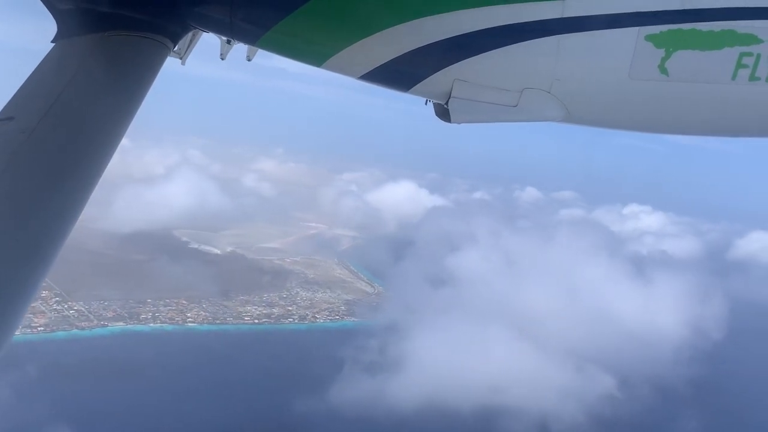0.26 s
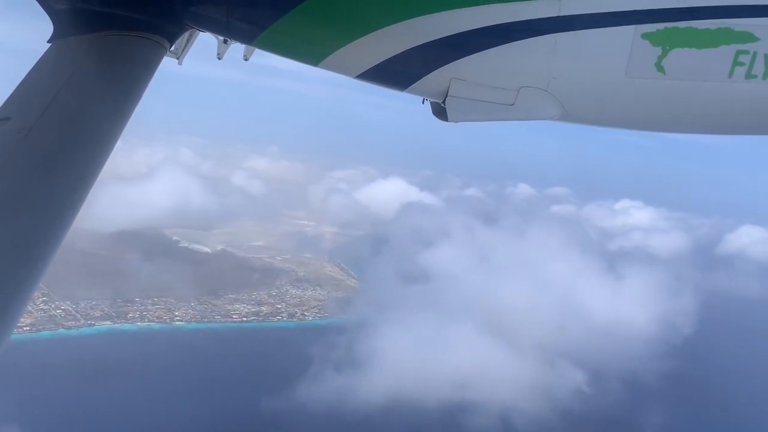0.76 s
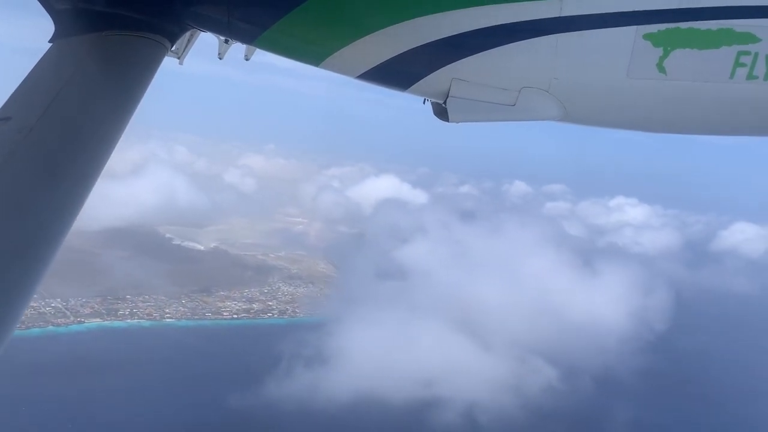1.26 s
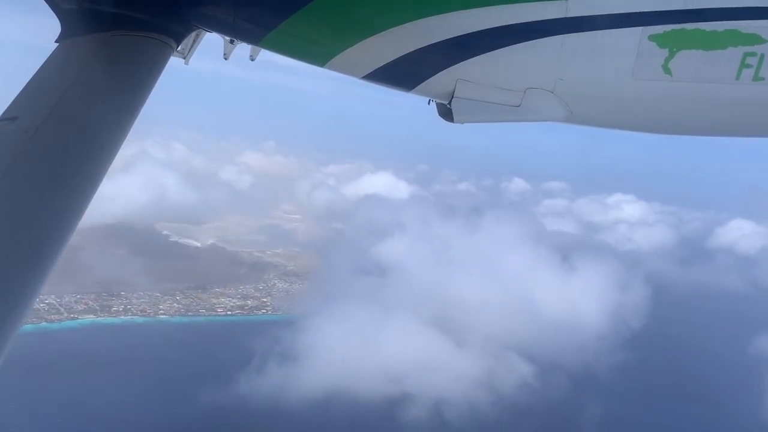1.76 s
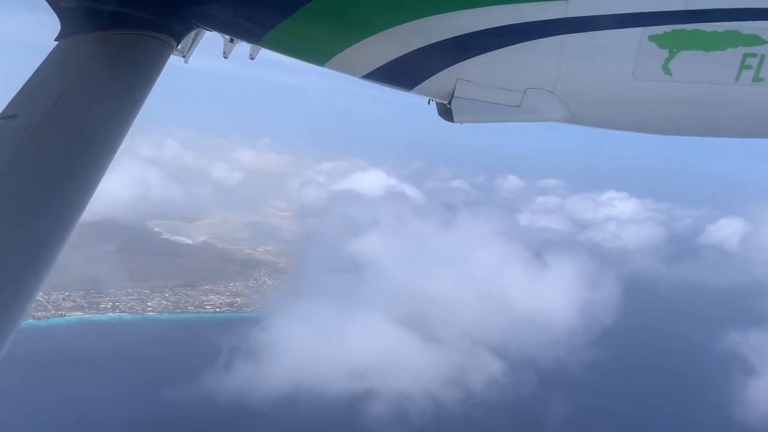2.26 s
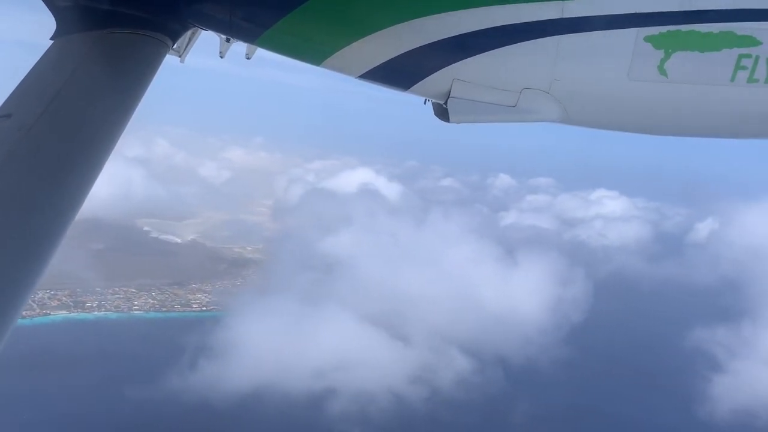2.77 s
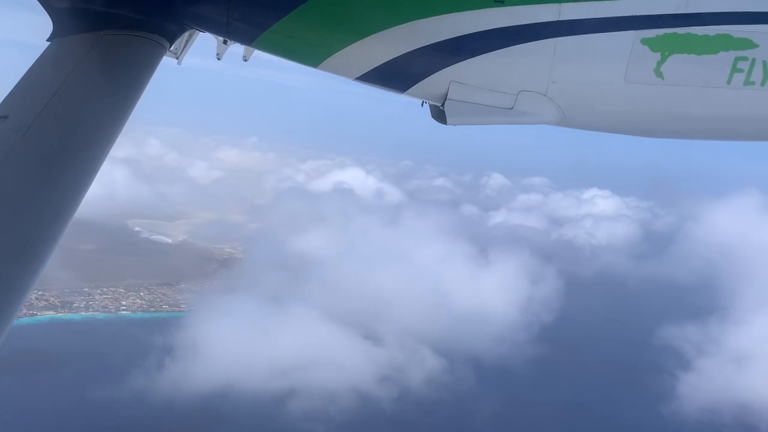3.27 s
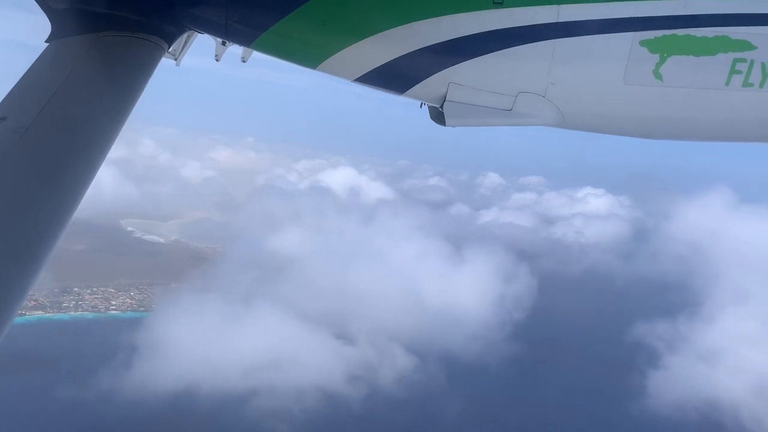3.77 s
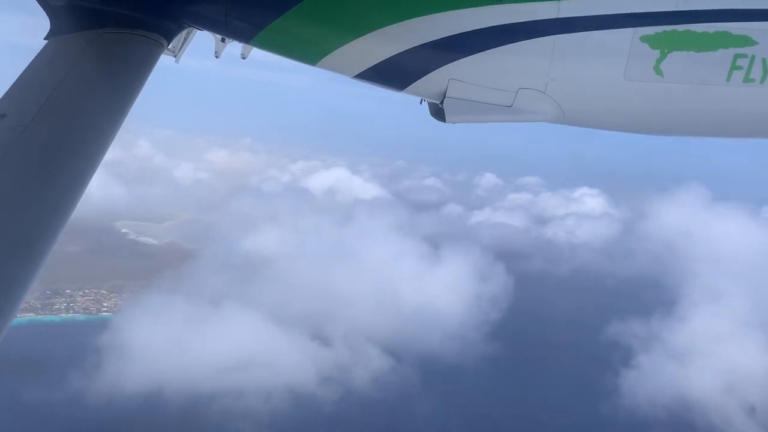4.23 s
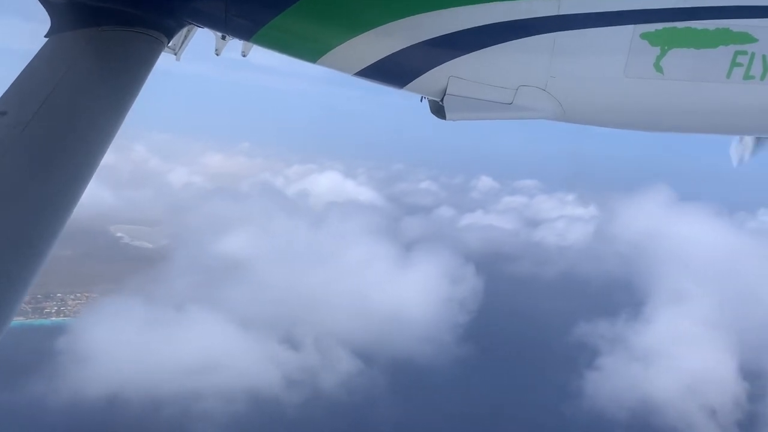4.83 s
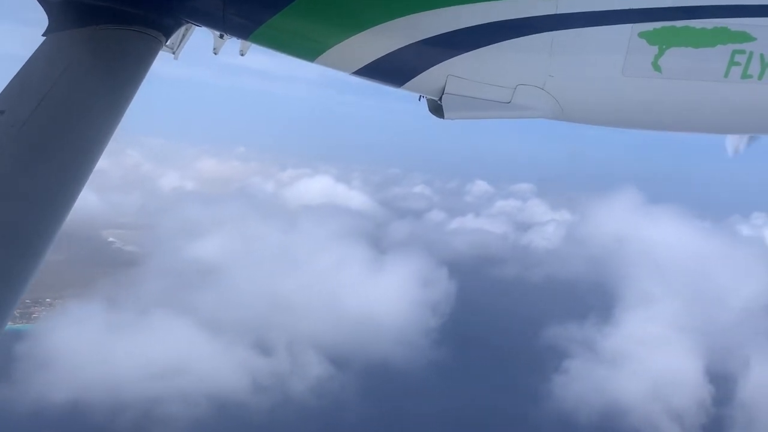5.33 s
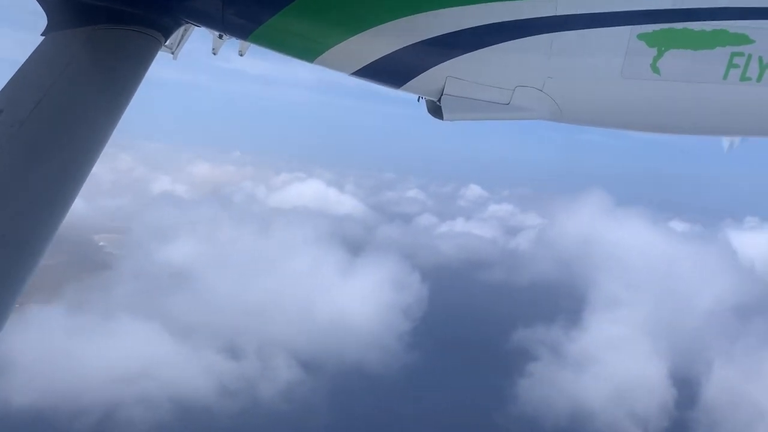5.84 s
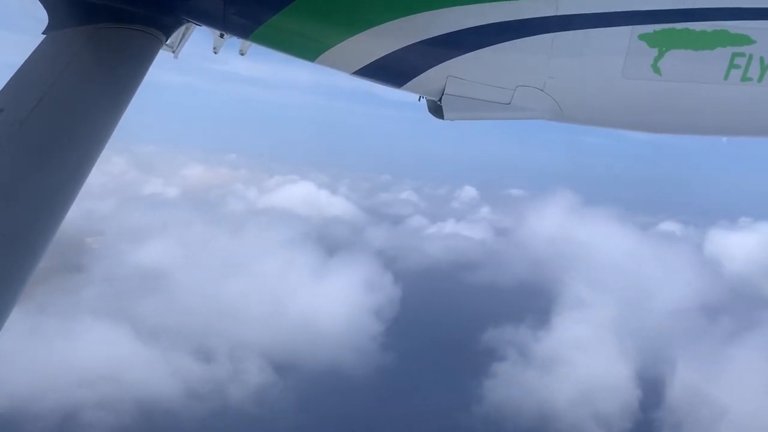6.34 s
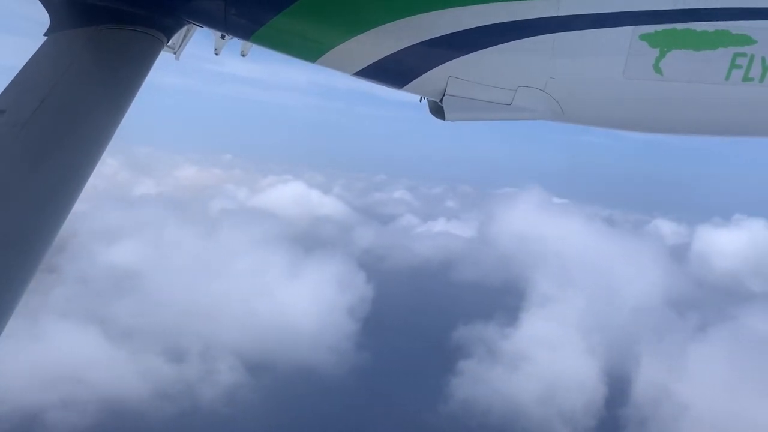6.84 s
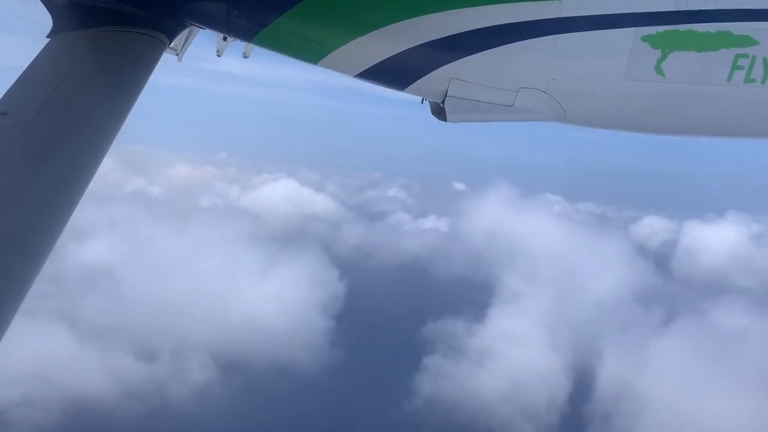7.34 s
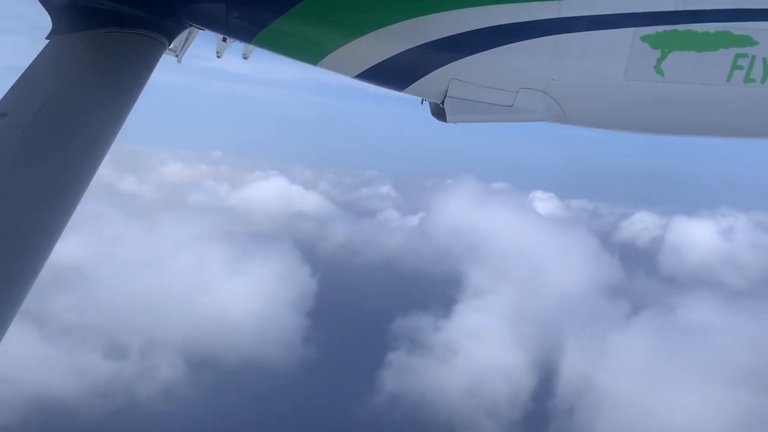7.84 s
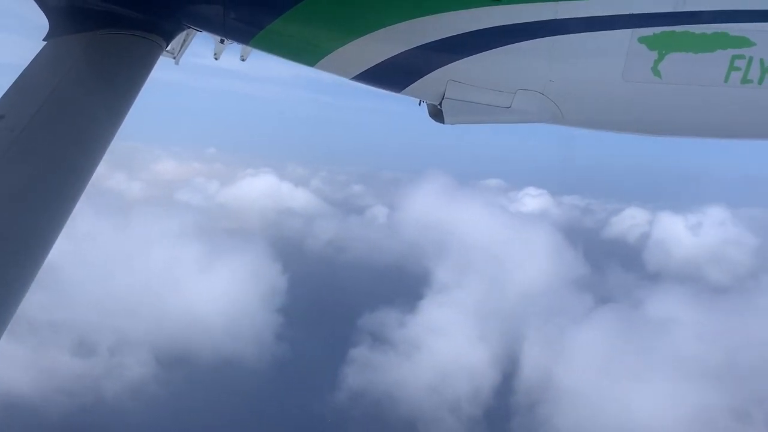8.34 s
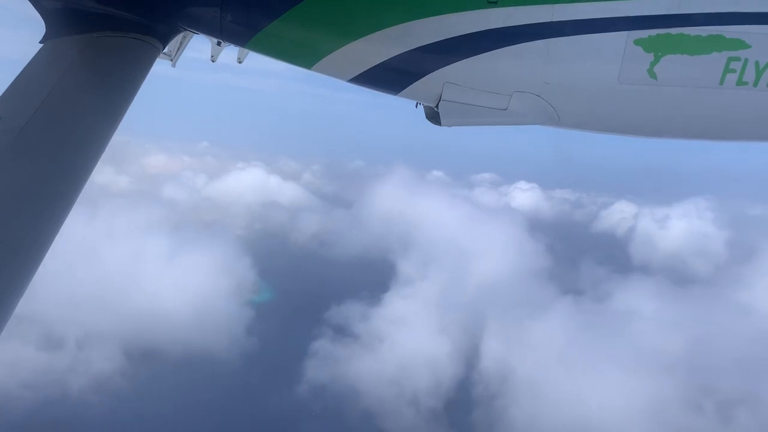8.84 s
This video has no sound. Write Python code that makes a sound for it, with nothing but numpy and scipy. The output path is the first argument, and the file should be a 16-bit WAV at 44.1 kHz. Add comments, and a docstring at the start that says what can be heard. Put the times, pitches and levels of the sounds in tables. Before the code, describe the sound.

A loud, low propeller drone fills a small plane's cabin, gently rising and falling, with rushing air and a faint whine.

```python
"""Inside the cabin of a twin turboprop in the climb, two close microphones beside a window.
Two three-blade propellers turn at almost the same speed, so their blade tones beat slowly. The trim
buzzes and the gearbox whines; these and the blade tones swell and fade as the microphones shift nearer
the wall and away. Airflow booms, rumbles and hisses through the wall, over a shaft hum and a faint whistle.
"""
import sys
import numpy as np
from scipy import signal
from scipy.fft import rfft, irfft, next_fast_len
from scipy.io import wavfile

SR = 44100
rng = np.random.default_rng(int(sys.argv[2]) if len(sys.argv) > 2 else 0)


def wav_out(sig):
    """Save sig, one row per channel (or a flat mono array), as 16-bit PCM at SR to the path in sys.argv[1]."""
    wavfile.write(sys.argv[1], SR, np.round(np.clip(np.atleast_2d(sig).T, -1, 1) * 32767).astype(np.int16))


N = 401310
TIME = np.arange(N) / SR
BLADES = 3

# Stereo image by frequency, with a hollow, out-of-phase band of hiss near 10-11 kHz:
# (frequency [Hz], likeness [0-1], left lead [rad], left over right [dB])
STEREO_IMAGE = [(30, .985, 0, -1), (70, .99, 0, -1.5), (220, .95, 0, -1.5), (400, .6, .2, 0),
                (520, .15, 0, 3), (800, .45, -1.1, 1), (1000, .2, -1.5, 2), (1200, .83, 0, 2),
                (1500, .45, -2.6, -1), (1680, .4, -2.4, 0), (1780, .3, -1, 0), (1940, .75, -2.2, 0),
                (2100, .4, -2.2, 1), (2300, .5, -.3, 2), (2440, .5, -2, 3), (2650, .3, 0, 2),
                (2930, .6, -2.3, 1), (3030, .4, -.5, 1), (3090, .5, -2.4, 1), (3300, .2, -2.5, 0),
                (4000, .2, 0, 1), (6000, .2, 0, -1.5), (6800, .5, 0, -1), (7000, .93, 0, -.5),
                (8100, .93, 0, 0), (8400, .6, -.5, 0), (9400, .89, -2.2, 0), (9600, .9, -2.6, 0),
                (9700, 1, -np.pi, 0), (11000, 1, -np.pi, 0), (11100, .9, -3.2, 0), (11600, .8, -3.4, 0),
                (11900, .72, -4.4, 0), (12350, .5, -5, 0), (12500, 1, -2 * np.pi, 0),
                (14400, 1, -2 * np.pi, 0), (14550, .8, -6.28, 0), (15050, .3, -6.28, 0),
                (15250, .75, -9.4, 0)]
# Hum and air at the seat: (time [s], hum at twice the shaft rate [dB], airflow hiss on the wall [dB])
CABIN_LEVELS = [(0, -47, -39), (1, -43, -38.5), (3.4, -44.5, -40), (4.6, -41, -39.5), (6, -38, -39.5),
                (6.8, -31, -37), (7.5, -36, -37), (8.2, -38, -37.5), (9.1, -36, -39.5)]


def propeller(blade_hz, start_rad, tones, gains_db):
    """Blade tones, each by its own path to either microphone, and the phase of the blade passes."""
    blade_phase = start_rad + 2 * np.pi * np.cumsum(blade_hz) / SR
    out = np.zeros((2, N))
    for k, left_db, right_db, left_rad, right_rad in tones:
        tone = np.cos(round(k) * blade_phase + [[left_rad], [right_rad]])
        out += tone * from_db([[left_db], [right_db]]) * from_db(gains_db.get(round(k), 0))
    return np.sqrt(2) * out, blade_phase


def twin_propellers(gains_db):
    """Two propellers beating through the cabin; also gives the right one's blade phase and rate."""
    # The governors hunt a little: (time [s], left blade rate [Hz], right blade rate [Hz])
    blade_rates = [(0.0, 85.922, 85.81), (0.7, 85.929, 85.793), (1.4, 85.881, 85.792),
                   (2.1, 86.093, 85.883), (2.8, 86.026, 85.976), (3.5, 86.155, 85.833),
                   (4.2, 86.012, 85.955), (4.9, 85.973, 85.938), (5.6, 85.984, 86.011),
                   (6.3, 86.203, 85.989), (7.0, 86.256, 85.926), (7.7, 86.267, 86.001),
                   (8.4, 86.07, 86.069), (9.1, 86.16, 86.013)]
    # Each propeller's tones at the microphones:
    # (harmonic, left base level [dB], right base level [dB], left lead [rad], right lead [rad])
    left_tones = [(1, -17.6, -16.8, .14, .29), (2, -25.6, -23.4, .14, .5), (3, -35.4, -34.2, .91, .9),
                  (4, -41.5, -38, 2.2, 2.0), (5, -50, -56, 0, 1), (6, -52, -58, 0, 3), (7, -60, -60, 0, 3),
                  (8, -58, -60, 0, 1), (9, -57, -60, 0, 1), (10, -60, -63, 0, 2)]
    right_tones = [(1, -18.7, -16.6, -.04, -.14), (2, -27.6, -24.7, 1.38, 1.76),
                   (3, -39.3, -40.8, 1.37, 1.2), (4, -41.5, -38, 1.2, 1.07), (5, -46, -47, 0, 1),
                   (6, -49, -58, 0, 3), (7, -57, -59, 0, 3), (8, -55, -60, 0, 1), (9, -53, -55.5, 0, 1),
                   (10, -56.5, -59, 0, 2), (11, -59, -61, 0, 2), (14, -56, -58, 0, 0)]
    left_hz, right_hz = in_time(blade_rates)
    left, _ = propeller(left_hz, start_rad=.25, tones=left_tones, gains_db=gains_db)
    right, right_phase = propeller(right_hz, start_rad=2.42, tones=right_tones, gains_db=gains_db)
    return left + right, right_phase, right_hz


def turbulence(spectrum, edges_hz, patchy_db):
    """Air noise through the wall, partly alike in both channels; each band flickers; mono rms 1."""
    # Wall and window resonances and dips: (frequency [Hz], width [Hz], gain [dB])
    wall_modes = [(73.6, 8.7, -6), (138, 25, 3.5), (189, 22, 3.5), (223.5, 30, -2.5), (270, 23, 3.5),
                  (326.4, 42, -4.5), (356, 52, 4.5), (425, 12, -5), (458, 33, 2.5), (587, 37, -1.5),
                  (2623, 80, -9), (8490, 540, 5.5), (676.4, 17.6, 8.5), (963, 34, 7.5), (1192, 75, 9),
                  (1365, 20, 6), (1946, 43, 9), (2280, 68, 4.5), (2666, 81, 5), (3050, 45, 7.5),
                  (1760, 120, -3), (9455, 540, 13), (11780, 400, 8)]
    size = next_fast_len(N)
    hz = np.maximum(np.arange(size // 2 + 1) * SR / size, 1)
    wall_db = sum(db / (1 + (2 * (hz - f) / width) ** 2) for f, width, db in wall_modes)
    alike, lead, tilt_db = at_hz(STEREO_IMAGE, hz)
    alike = np.clip(alike, 0, 1)
    shared, own = rfft(rng.standard_normal((2, size)))
    left = shared * np.exp(1j * lead) * from_db(tilt_db / 2)
    right = (alike * shared + np.sqrt(1 - alike ** 2) * own) * from_db(-tilt_db / 2)
    pair = from_db(at_hz(spectrum, hz)[0] + wall_db) * np.array([left, right])
    together = drift(1.9)
    out = 0
    for low, high in zip(edges_hz, edges_hz[1:]):
        band = irfft(pair * ((hz >= low) & (hz < high)), size)[:, :N]
        out = out + band * from_db(patchy_db * (0.2 * together + drift(17.6)))
    return out / np.sqrt(np.mean(out.mean(0) ** 2))


def airflow(blade_phase):
    """Air rushing along the outside of the wall: boom, rumble and hiss swell together."""
    # Spectra before the wall colours them: (frequency [Hz], relative density [dB])
    boom_shape = [(15, -24), (24, -15.5), (30, -8.5), (45, -2), (62, -0.5), (80, -4.5), (110, -28.5)]
    rumble_shape = [(50, -38), (75, -2.5), (110, -4.5), (150, -6.5), (220, 1), (300, -5), (400, -8.5),
                    (520, -14), (800, -30.5)]
    hiss_shape = [(300, -4.5), (500, -2.5), (800, 0), (1000, -4.5), (1130, -8.5), (1500, -5.5), (1800, -8),
                  (2600, -10.5), (3300, -15), (4500, -19), (6000, -26), (8500, -25.5), (11000, -27),
                  (12300, -26), (12450, -29), (15600, -29)]
    _, hiss_db = in_time(CABIN_LEVELS)
    swell_db = hiss_db - hiss_db.mean()
    boom = from_db(-37.5 + 1.3 * swell_db) * turbulence(boom_shape, [15, 120], patchy_db=-0.7)
    rumble = from_db(-26 + 0.76 * swell_db) * turbulence(rumble_shape, [45, 200, 450, 900], patchy_db=1.63)
    hiss = turbulence(hiss_shape, [300, 700, 1400, 2800, 5600, 8800, 11500, 16500], patchy_db=.45)
    throb = 1 + .04 * np.cos(blade_phase)   # each blade wake sweeps the wall
    return boom + rumble + from_db(hiss_db) * throb * hiss


def shaft_hum(blade_phase, blade_hz):
    """A propeller shaft hums low, once and twice a turn."""
    twice_db, _ = in_time(CABIN_LEVELS)
    angle, shaft_hz = blade_phase / BLADES, blade_hz.mean() / BLADES
    once = wavering_tone(angle, shaft_hz, level_db=-46, waver_db=.7)
    twice = wavering_tone(2 * angle, 2 * shaft_hz, twice_db, waver_db=2.5)
    return once + twice


def trim_buzz(blade_hz=85.92):
    """The cabin trim buzzes thinly at high multiples of a steady blade rate."""
    # Buzz partials: (multiple, base level at the start [dB], at the end [dB])
    partials = [(100, -76, -76), (104, -75, -75), (108, -72, -74), (109, -63, -68), (110, -72, -61),
                (111, -73, -73), (116.67, -76, -76), (117.67, -80, -80), (122.64, -77, -77),
                (127, -78, -78), (136, -73, -73), (137, -73, -73), (138, -71, -71), (139, -72, -72),
                (141, -79, -79), (143, -77, -77)]
    phase = 2 * np.pi * blade_hz * TIME + .004 * drift(2)
    return sum(wavering_tone(k * phase, k * blade_hz, np.linspace(first_db, last_db, N), waver_db=3.5)
               for k, first_db, last_db in partials)


def gearbox_whine():
    """High gearbox tones, wandering a little in phase."""
    # Gear tones: (frequency [Hz], base level [dB])
    gear_tones = [(2439, -63), (2525, -68), (2926, -68), (9507, -74), (9593, -69), (9624, -75)]
    return sum(wavering_tone(2 * np.pi * hz * TIME + 1.5 * drift(3.4), hz, db, waver_db=6.0)
               for hz, db in gear_tones)


def whistle():
    """A faint tone in the background that drifts upward."""
    # The whistle's course: (time [s], pitch [Hz], level [dB])
    course = [(0, 929, -55), (4.3, 931, -56), (5.6, 948, -59), (7, 960, -57), (9.1, 962, -58)]
    hz, level_db = in_time(course)
    phase = 2 * np.pi * np.cumsum(hz) / SR + .6 * drift(3)
    return wavering_tone(phase, hz.mean(), level_db, waver_db=5.0)


def wavering_tone(phase, hz, level_db, waver_db):
    """A tone of unsteady level, placed in the stereo image by its pitch."""
    _, lead, tilt_db = at_hz(STEREO_IMAGE, hz)
    start = rng.uniform(0, 2 * np.pi)
    pair = np.cos(phase + start + np.array([[lead], [0]])) * from_db([[tilt_db / 2], [-tilt_db / 2]])
    return np.sqrt(2) * from_db(level_db + waver_db * drift(4)) * pair


def drift(rate_hz):
    """Slow random wander of spread 1, smoothed above rate_hz."""
    pole = np.exp(-80 * np.pi * rate_hz / SR)   # one step per 40 samples
    noise = rng.standard_normal(N // 40 + 2002)
    slow = signal.lfilter([1], [1, -2 * pole, pole * pole], noise)[2000:]
    return np.interp(np.arange(N) / 40, np.arange(len(slow)), slow / slow.std())


def from_db(db):
    """Decibels to gain."""
    return 10 ** (np.asarray(db) / 20)


def in_time(rows):
    """Columns of a time table, sample by sample."""
    times, *columns = np.transpose(rows)
    return [np.interp(TIME, times, c) for c in columns]


def at_hz(rows, hz):
    """Columns of a frequency table, read on a log axis."""
    freqs, *columns = np.transpose(rows)
    return [np.interp(np.log(hz), np.log(freqs), c) for c in columns]


def scene():
    """The window seat: propellers, buzz and whine grow as the microphones near the wall."""
    # The microphones shift: (time [s], wall closeness [dB], third blade tone gain [dB], fourth [dB])
    mic_spots = [(0, -.1, -6, 2), (1.4, -.6, 7.5, 2), (2.8, -1.2, -6, 3.5), (4.2, .3, -4, 1),
                 (5.8, 1.3, 2.5, -4), (7.2, 1.1, 3.5, 1.5), (9.1, -.7, 8, -1)]
    close_db, third_db, fourth_db = in_time(mic_spots)
    propellers, right_phase, right_hz = twin_propellers({3: third_db, 4: fourth_db})
    near_wall = from_db(close_db) * (propellers + trim_buzz() + gearbox_whine())
    return near_wall + airflow(right_phase) + whistle() + shaft_hum(right_phase, right_hz)


def record(dry, cutoff_hz=15640):
    """A steep low-pass takes the very top off both channels."""
    return signal.sosfilt(signal.ellip(14, .03, 70, cutoff_hz, fs=SR, output="sos"), dry)


dry = scene()
out = record(dry)
wav_out(out)
```